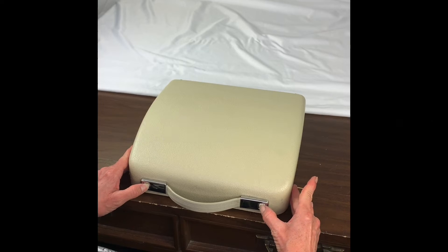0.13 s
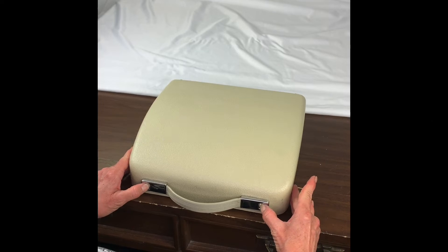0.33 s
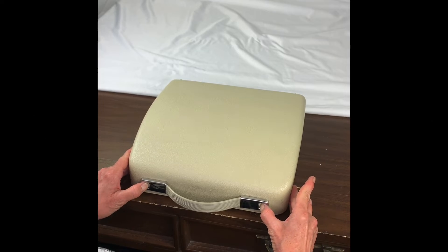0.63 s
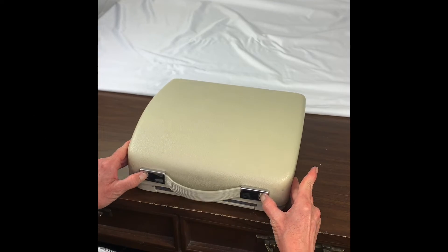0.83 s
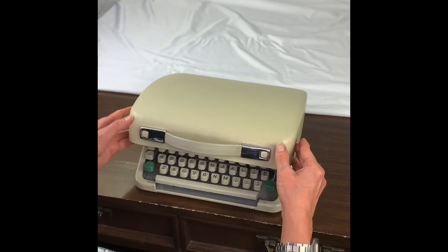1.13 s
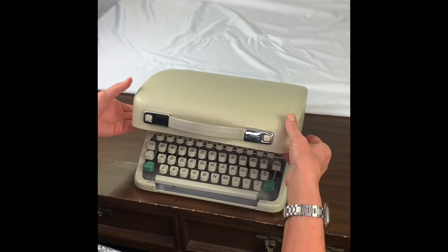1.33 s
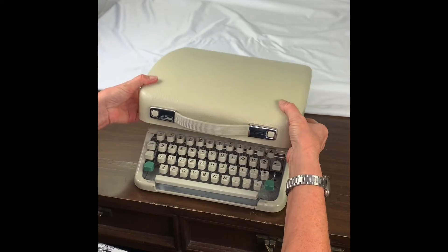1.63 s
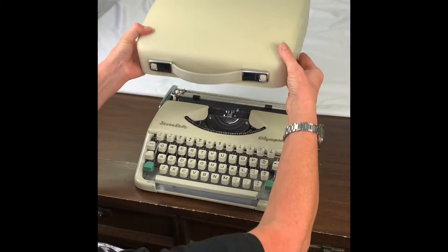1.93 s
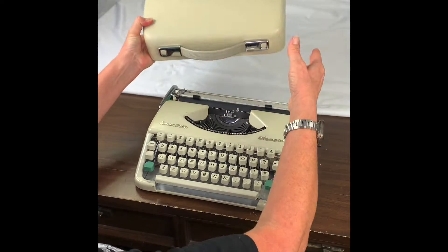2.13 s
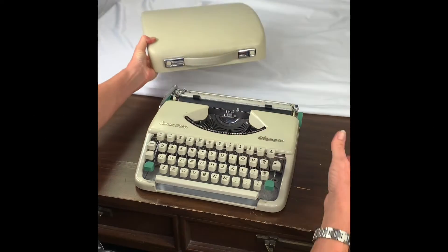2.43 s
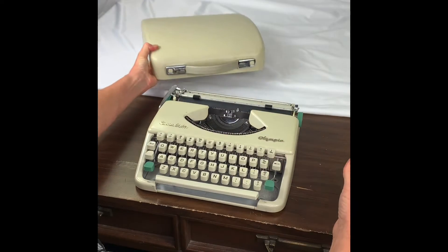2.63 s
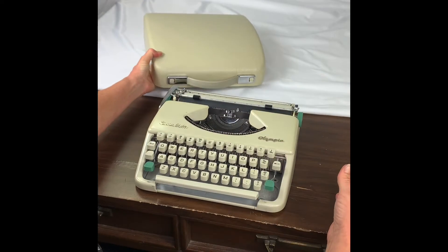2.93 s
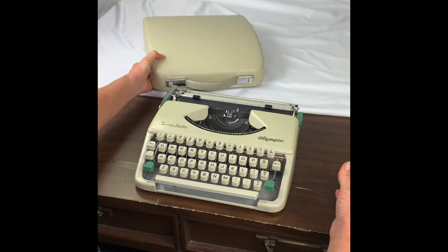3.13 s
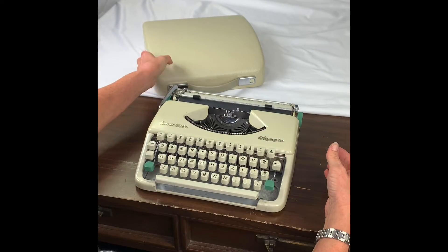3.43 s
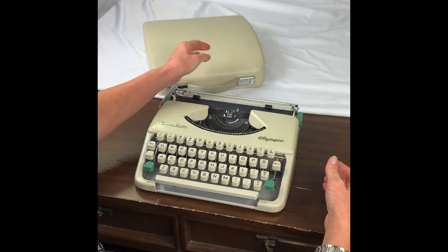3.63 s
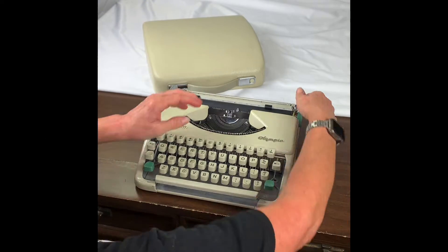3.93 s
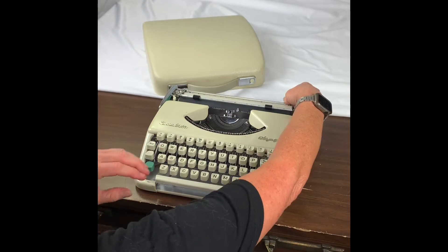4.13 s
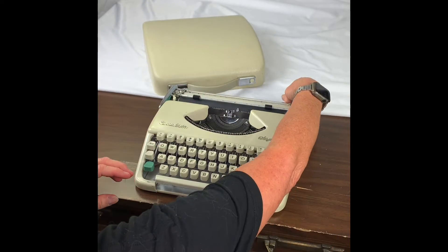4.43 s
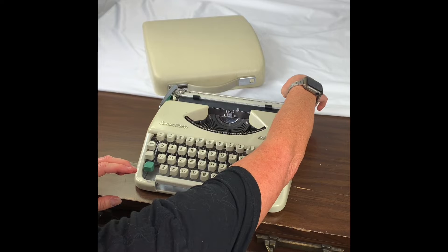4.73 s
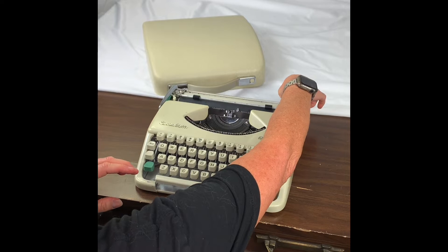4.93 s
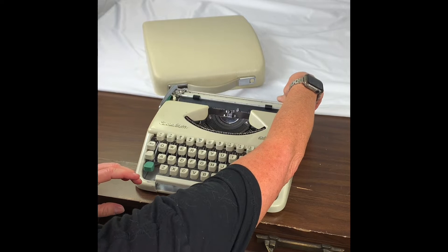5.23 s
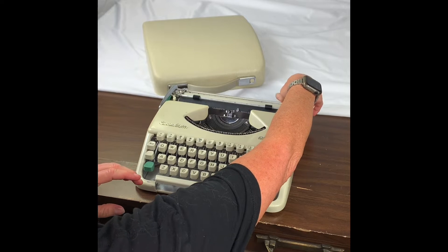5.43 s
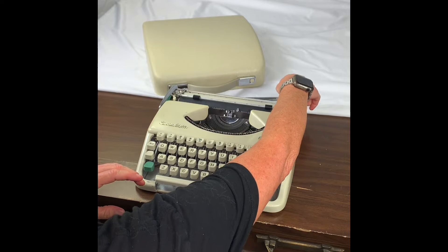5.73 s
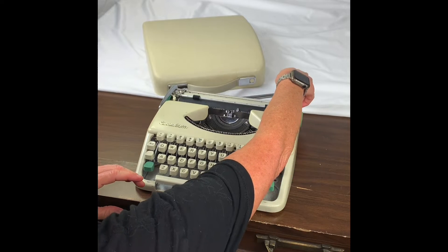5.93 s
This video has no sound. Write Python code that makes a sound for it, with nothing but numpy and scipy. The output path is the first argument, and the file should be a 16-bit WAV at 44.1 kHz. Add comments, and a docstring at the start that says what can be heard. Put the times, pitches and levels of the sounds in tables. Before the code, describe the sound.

Close up in a small room, latches spring, a plastic lid rattles free and knocks down on a table, followed by a crisp metallic lever snap.

```python
"""Over a low room rumble, thumbs spring the two metal latches of a hard plastic typewriter case (steel clicks).
The lid scrapes (stick-slip noise) and bumps off the machine (ringing shell, rim and table modes),
then is set down behind it with three hollow knocks. Later a hand snaps a steel lever on the carriage.
A small furnished room adds a short diffuse tail; a phone held above the table hears it at two ports."""
import sys
import numpy as np
from scipy import signal
from scipy.fft import rfft, irfft, next_fast_len
from scipy.io import wavfile
from scipy.ndimage import uniform_filter1d

SR = 44100
rng = np.random.default_rng(int(sys.argv[2]) if len(sys.argv) > 2 else 0)


def volts_from_db(level):
    """Convert decibel levels to linear amplitude ratios."""
    exponent = np.asarray(level, float) / 20
    return 10 ** exponent


def unload_audio(sound):
    """Save the sound as a 16-bit wav file, at the path given as the first command line argument."""
    columns = np.transpose(np.atleast_2d(sound))
    # keep every value between -1 and 1, then stretch to whole-number steps
    steps = np.round(np.clip(columns, -1, 1) * 32767)
    wavfile.write(sys.argv[1], SR, steps.astype(np.int16))


N = 268877  # samples

# hollow bumps of the lid, its knocks on the table, and last two faint thumps under the lever snap;
# rows a few ms apart are one knock ringing at several pitches:
# (time [s], peak of low rings [dB], low ring [Hz], upper ring [Hz], upper rings re low [dB])
BUMPS = [(0.35, -36.5, 295, 635, -5), (0.362, -21.5, 226, 660, -8.5), (0.483, -37.5, 208.7, 640, -23),
         (0.7, -40.5, 189, 650, -10.5), (0.72, -35.5, 216, 646, -3.5), (0.731, -30.5, 208, 656, -10),
         (0.756, -31, 228, 695, -18), (0.788, -31, 253, 854, -14), (0.994, -37, 289, 700, -37.5),
         (1.057, -30, 156, 657, -3.5), (1.096, -22.5, 307.4, 632, -3), (1.184, -29.5, 364, 633, -13),
         (1.287, -54, 292, 855, 13.5), (1.439, -44.5, 239, 865, -5), (1.482, -41.5, 320.5, 657, -6),
         (1.564, -38.5, 316, 640, -0.5), (1.581, -44, 300, 643, 8), (1.667, -27, 319.2, 964, 1.5),
         (1.682, -31.5, 218, 667, 5), (1.843, -39, 369, 638, -2), (1.854, -37, 377, 662, -12.5),
         (1.924, -51.5, 262, 647, 14), (1.966, -50.5, 380, 496, 4), (2.001, -43.5, 237, 516, 6),
         (2.072, -40, 376, 616, -5), (2.223, -62.5, 350, 590, 9.5), (2.546, -34.5, 267, 720, -4),
         (2.556, -8, 352.5, 735, -1.5), (2.557, -10.5, 191, 544, -13), (2.559, -11.5, 267.4, 646, 1),
         (2.598, -25, 336, 522, -15), (2.79, -52, 138, 644, -3), (2.948, -36.5, 284, 708, -2),
         (2.96, -11, 363, 780, -1.5), (2.961, -10.5, 270, 530, -12), (3.001, -29.5, 180, 485, -8.5),
         (3.129, -44.5, 149, 775, -10), (3.358, -16, 260, 610, -0.5), (3.362, -6.5, 213.9, 584, -12),
         (3.366, -18, 258, 744, 5.5), (3.379, -16.5, 376, 710, -7), (4.499, -52, 207, 668, 13),
         (4.525, -47, 180, 523, -6.5)]
# modes of the lid shell: (frequency [Hz], level [dB], t60 before scaling [s])
SHELL = [(142, -14.5, 0.2), (180, 5, 0.13), (195.7, 1, 0.3), (217.5, 7, 0.072), (248.8, -1.5, 0.057),
         (264.2, -5, 0.14), (289, 2.5, 0.15), (299.4, -2, 0.041), (348, 7.5, 0.079), (376, -2, 0.13),
         (445.5, -13.5, 0.3), (492, -4.5, 0.047), (522, -9.5, 0.18), (583.2, 0, 0.077), (646, 0, 0.065),
         (715, 4, 0.06), (775, -5, 0.039), (884, -12.5, 0.1), (1035, -3, 0.055), (1065, -15, 0.069)]
# modes of the table top: (frequency [Hz], level [dB], t60 before scaling [s])
TABLE_TOP = [(52, -14, 0.14), (73, -9, .8), (86.5, -9, 0.5)]


def along(table, hz):
    """A (frequency [Hz], value) table read on a log-frequency axis."""
    f, value = np.transpose(table)
    return np.interp(np.log(hz + 1), np.log(f + 1), value)


def unit(x):
    """Scale to rms 1."""
    return x / np.sqrt(np.mean(x ** 2))


def band(x, lo_hz, hi_hz):
    """Band-pass."""
    return signal.sosfilt(signal.butter(2, [lo_hz, hi_hz], "band", fs=SR, output="sos"), x)


def coloured(x, table):
    """Filter by a (frequency [Hz], gain [dB]) table."""
    n = x.shape[-1]
    gain = volts_from_db(along(table, np.fft.rfftfreq(n, 1 / SR)))
    return irfft(rfft(x) * gain, n)


def walk(rate_hz):
    """Random levels held 1 / rate_hz seconds and slewed twice."""
    hold = int(SR / rate_hz)
    steps = np.repeat(rng.standard_normal(N // hold + 1), hold)
    return 1.3 * uniform_filter1d(uniform_filter1d(steps, hold), hold)[:N]


def patchy(x, lo_hz, hi_hz, patchy_db, count=4):
    """Neighbouring bands, each with its own quick and slow flicker."""
    edges_hz = np.geomspace(lo_hz, hi_hz, count + 1)
    return sum(band(x, lo, hi) * volts_from_db(patchy_db * (walk(25) + walk(120)))
               for lo, hi in zip(edges_hz, edges_hz[1:]))


def add(out, s, sound, peak_db):
    """Lay a sound at time s with its peak at peak_db."""
    i = int(s * SR)
    out[:, i:i + sound.shape[1]] += (volts_from_db(peak_db) * sound / np.abs(sound).max())[:, :N - i]


def favour(modes, ring_hz, depth_db, octaves):
    """Where a thing is struck favours the modes near one pitch (dB)."""
    away = np.abs(np.log2(modes[:, :1] / ring_hz)) / octaves
    return -depth_db * np.minimum(away, 1)


def uneven(modes):
    """No two clicks share out their push among the modes alike (dB)."""
    return 2.5 * rng.standard_normal((len(modes), 1))


def rings(modes, gain_db, length, rise_cycles, spread, detune, stagger=np.pi):
    """Stereo sum of fading modes that swell over a few cycles; the ports differ a little in phase."""
    hz, db, t60_s = np.transpose(modes)[:, :, None]
    t = np.arange(int(0.35 * SR)) / SR
    chance = rng.standard_normal((2, len(modes), 1))
    start_rad = stagger * np.arange(len(modes))[:, None]
    turn = 2 * np.pi * hz * (1 + detune * chance[0]) * t + start_rad
    swell = 1 - np.exp(-t * hz / rise_cycles)
    fade = volts_from_db(db + gain_db - 60 * t / (t60_s * length)) * swell
    skew = spread * chance[1] * np.minimum(hz / 700, 1)  # radians, less in the bass
    return np.array([(fade * np.sin(turn + side * skew)).sum(0) for side in (1, -1)])


def crack(lo_hz, hi_hz, t60_s):
    """A noise burst standing for many unresolved short rings."""
    t = np.arange(int(0.2 * SR)) / SR
    mid, side = rng.standard_normal((2, len(t)))
    envelope = volts_from_db(-60 * t / t60_s) * (1 - np.exp(-t / 0.00037))
    burst = np.array([mid + 0.083 * side, mid - 0.13 * side]) * envelope
    return band(burst, lo_hz, hi_hz)


def rumble():
    """House and distant traffic: deep, nearly steady noise, alike at both ports only in the bass."""
    # (frequency [Hz], relative density [dB per Hz])
    spectrum = [(12, -44), (20, -15.5), (35, -9.5), (60, -0.5), (120, -8), (172, -6), (204, -16), (270, -9),
                (422, -15.5), (459, -15), (760, -26), (1060, -38), (1710, -39.5), (4060, -52),
                (7000, -54.5), (9600, -51.5), (16000, -60)]
    # (frequency [Hz], left-right correlation [-1..1])
    likeness = [(60, 0.92), (130, 0.93), (290, 0.38), (640, -0.75), (1410, -0.6), (3100, 0.23),
                (6820, 0.16), (15000, -0.0064)]
    n = next_fast_len(N)
    hz = np.fft.rfftfreq(n, 1 / SR)
    like = np.clip(along(likeness, hz), -0.99, 0.99)
    mid, side = rfft(rng.standard_normal((2, n))) * volts_from_db(along(spectrum, hz))
    mid = irfft(mid, n)[:N]
    side = irfft(side * np.sqrt((1 - like) / (1 + like)), n)[:N]
    level_db = -55.5 + 1.2 * walk(6)
    return volts_from_db(level_db) * np.array([mid + side, mid - side]) / np.std(mid)


def room(x):
    """Walls and furniture return a short diffuse tail, duller with time; its bass is alike at both ports."""
    # (frequency [Hz], t60 [s])
    decay = [(100, 0.33), (400, 0.14), (1500, 0.17), (5000, 0.18), (12000, 0.019)]
    t = np.arange(int(0.5 * SR)) / SR
    tail = 0
    for f in 60.0 * 2 ** np.arange(9):  # octave bands
        mid, side = band(rng.standard_normal((2, len(t))), f / 2 ** 0.5, min(f * 2 ** 0.5, 20000))
        pair = mid + min(f / 500, 1) * side * np.array([[1], [-1]])
        tail = tail + pair * volts_from_db(-60 * t / along(decay, f))
    tail = tail * (1 - np.exp(-t / 0.0047))
    tail = tail / np.sqrt(np.sum(tail ** 2) / 2)  # unit mean energy per port
    return volts_from_db(-10.5) * signal.oaconvolve(x, tail, axes=1)[:, :N]


def ports(x):
    """The two microphone ports hear the table out of step, by pitch."""
    # (frequency [Hz], left port's phase lead [rad])
    lead = [(30, .1), (150, .35), (350, .7), (1500, .7), (2300, 1.5), (4500, 2.6), (7300, 2.6), (8600, .7),
            (10600, -1.7), (13600, -5.7), (16400, -9.6)]
    n = next_fast_len(N)
    turn = np.exp(0.5j * along(lead, np.fft.rfftfreq(n, 1 / SR)))
    return irfft(rfft(x, n) * [turn, 1 / turn], n)[:, :N]


def thuds():
    """The machine or a wrist leaning on the table top: soft weight stirs only its deep modes."""
    # (time [s], peak [dB])
    leans = [(0.377, -39.5), (4.524, -43), (4.598, -45)]
    out = np.zeros((2, N))
    for s, db in leans:
        add(out, s, rings(TABLE_TOP, 0, 0.25, 1.0, 0.1, 0.025), db)
    return out


def stroke(start_s, length_s):
    """Pressure swells to a peak halfway and eases off; it fades out within a quarter length of either end."""
    at = (np.arange(N) / SR - start_s) / length_s
    return volts_from_db(np.interp(at, [-0.25, 0, 0.5, 1, 1.25], [-60, -7, 0, -7, -60], -200, -200))


def slides():
    """Lid and hands stick and slip: uneven friction grains rasp at the rim, boom in the shell and hiss."""
    # (start [s], length [s], rasp [dB], hollow re rasp before its 6.5 dB cut [dB], hiss re rasp [dB])
    strokes = [(0.026, 0.013, -65.5, -12, -38), (0.12, 0.07, -74, 5, -27), (0.45, 0.12, -80, 28.5, -3.5),
               (0.717, 0.11, -69, 24.5, -23), (0.81, 0.12, -70, 25.5, -7.5), (0.956, 0.23, -56, 13, -9.5),
               (1.13, 0.1627, -57.5, 12.5, -7.5), (1.259, 0.13, -64.5, 19.5, -1),
               (1.413, 0.088, -59.5, 8.5, -7.5), (1.495, 0.04, -59.5, 13, -5.5),
               (1.543, 0.16, -53.5, 7, -2), (1.883, 0.2, -63, 21.5, -4), (2.184, 0.082, -70, 21.5, -26),
               (3.105, 0.087, -70.5, 18.5, -2.5), (3.188, 0.1, -66.5, 22, 0.5),
               (3.287, 0.14, -67.5, 25, -0.5), (4.332, 0.1, -71.5, 6, -16.5),
               (5.274, 0.0736, -76, 8, -16.5), (5.628, 0.13, -73.5, -13, -3.5)]
    # friction spectrum: (frequency [Hz], relative density [dB per Hz])
    rub = [(530, -29.5), (900, -16), (1560, -3), (2070, -2), (2750, -8), (3500, -27.5), (5000, -16.5),
           (6800, -18.5), (8960, -17.5), (11500, -23.5), (12800, -26), (15500, -33.5)]
    catches = volts_from_db(2.2 * rng.exponential(size=N) + 3 * walk(300) + 1.5 * walk(45))
    grains = coloured(rng.standard_normal((2, N)) * catches, rub)
    push = rng.standard_normal(N) * volts_from_db(3 * walk(30))
    hollow = sum(volts_from_db(db + 2.5 * walk(12)) * band(push, f * 0.93, f * 1.07) for f, db, _ in SHELL[3:-1])
    hollow = volts_from_db(-6.5) * unit(hollow)
    rasp = unit(patchy(grains, 1000, 4800, 1.7))
    hiss = unit(patchy(grains, 3000, 15500, 0.9))
    out = np.zeros((2, N))
    for s, length_s, db, hollow_db, hiss_db in strokes:
        rubbing = rasp + volts_from_db(hollow_db) * hollow + volts_from_db(hiss_db) * hiss
        out += volts_from_db(db) * stroke(s, length_s) * rubbing
    return out


def clicks(table, modes, length, snap_db, jangle_db, clatter_db, top_hz):
    """Steel on steel: a snap, thin rings, and a broad jangle and clatter of loose parts."""
    out, modes = np.zeros((2, N)), np.array(modes)
    low, high = modes[modes[:, 0] < 5000], modes[modes[:, 0] > 5000]
    for s, db, high_hz, low_hz, low_db in table:
        high_gain_db = favour(high, high_hz, 11.0, 0.098) + uneven(high)
        low_gain_db = favour(low, low_hz, 10, 0.33) + uneven(low)
        add(out, s, crack(5300, top_hz, 0.015), db + snap_db)
        add(out, s, rings(high, high_gain_db, length, 1.9, 0.24, 0.0006), db)
        add(out, s, rings(low, low_gain_db, length, 1.2, 0.61, 0.003), db + low_db)
        add(out, s, crack(5000, top_hz, 0.087 * length), db + jangle_db)
        add(out, s, crack(350, 6500, 0.18 * length), db + low_db + clatter_db)
    return out


def levers():
    """Carriage levers: steel clicks with long thin rings up to 15 kHz."""
    # (time [s], peak of high rings [dB], high ring [Hz], low ring [Hz], low rings re high [dB])
    hits = [(4.0193, -73, 9100, 1330, 6.5), (4.458, -59, 13270, 1820, -0.5),
            (4.4618, -35, 12600, 4500, -12), (4.4982, -18, 10160, 1800, -13),
            (4.5064, -23, 11000, 1880, -9), (4.5204, -26.5, 10160, 2083, -12),
            (4.5374, -34, 9650, 1023, -14), (5.0649, -66, 8170, 3920, 6.5), (5.4266, -48.5, 8200, 1850, -1),
            (5.428, -50.5, 5870, 4500, -2), (5.4404, -66, 6200, 3540, -6),
            (5.6164, -69.5, 5340, 1780, 13.5), (5.7194, -72.5, 6270, 2083, -6)]
    # (frequency [Hz], level [dB], t60 before scaling [s])
    lever_modes = [(1034, -1, 0.13), (1430, -6, 0.08), (1625, -3, 0.06), (1880, 0, 0.05), (2083, 0, 0.11),
                   (2780, -6, 0.08), (3042, -8, 0.11), (3290, -5, .04), (3671, -4, 0.14), (4005, -2, 0.056),
                   (4436, -3, 0.1), (5340, -11, 0.12), (5846, -4, 0.07), (6266, -3, 0.06), (6767, -7, .087),
                   (7359, -10, 0.12), (8129, -1, 0.1), (9017, -8, 0.1), (9405, -4, 0.08), (9545, -3, 0.09),
                   (9636, -3, 0.11), (10160, 5, 0.075), (10240, -2, 0.1), (11100, 0, 0.06),
                   (12690, -3, 0.12), (12820, -4, .11), (12980, 4, .055), (14000, -3, .14),
                   (15090, -3, 0.17), (15380, -2, 0.1)]
    return clicks(hits, lever_modes, 0.9, 0.37, -4.0, -1.25, 14000)


def latches():
    """Latch springs, pressed and later jolted: shorter steel clicks."""
    # (time [s], peak of high rings [dB], high ring [Hz], low ring [Hz], low rings re high [dB])
    hits = [(0.2668, -65, 7660, 3100, 1), (0.294, -56.5, 8340, 2120, -1), (0.3045, -49, 7800, 1440, -7),
            (0.3217, -45.5, 8800, 1320, -12), (0.3353, -39.5, 8500, 3960, -6),
            (0.3504, -45.5, 8700, 1460, 6.5), (0.3612, -44.5, 8570, 1300, 8),
            (0.3706, -39, 10300, 3070, -12), (0.4436, -46.5, 7000, 3170, 2), (1.667, -46.5, 8085, 4780, 4),
            (2.960, -56.5, 8400, 4640, -11), (3.358, -38.5, 6190, 4580, -19)]
    # (frequency [Hz], level [dB], t60 before scaling [s])
    latch_modes = [(1040, -4, .08), (1281, -6, 0.16), (1362, -4, 0.16), (1770, -5, 0.18), (2100, -10, 0.1),
                   (2747, -1, 0.11), (3074, -2, 0.1), (3503, -3, 0.09), (4030, -9, 0.07), (4610, -5, 0.04),
                   (5211, -2, 0.08), (5700, 4, .05), (6100, 6, 0.08), (7360, 10.5, 0.039),
                   (7940, 12.5, 0.049), (8550, 13, 0.025), (9100, -1.5, 0.048), (10300, 2, 0.06),
                   (13100, -21.5, 0.056)]
    return clicks(hits, latch_modes, 0.66, 0.89, -2.6, -8.5, 8600)


def rim():
    """Hard contacts ring the bare rim with a crack and an edge tick; dull bumps do so faintly."""
    # (time [s], peak of rings [dB], ring [Hz], edge tick re rings [dB])
    clacks = [(0.361, -38, 2560, 3), (0.478, -54, 1390, -25.5), (0.718, -45, 1950, -37),
              (0.788, -45.5, 1480, -37), (0.993, -54, 1900, -11), (1.044, -41.5, 1240, -24),
              (1.091, -47.5, 1850, -4), (1.182, -39, 1360, -9.5), (1.287, -34.5, 1860, -37),
              (1.29, -42, 2280, -32), (1.437, -55, 2100, -4), (1.578, -49, 2500, 1.5),
              (1.664, -28.5, 2100, -8), (1.68, -34.5, 2680, -9), (1.908, -56, 2100, -3),
              (1.926, -40.5, 1840, -5.5), (1.964, -46, 1950, -19), (1.993, -47, 2020, -3),
              (2.001, -43.5, 1950, -19), (2.027, -50.5, 2000, 3), (2.06, -35.5, 1900, -9),
              (2.188, -56, 1800, -30), (2.206, -50, 1970, -32), (2.222, -54, 1970, -29.5),
              (2.243, -54.5, 1990, -31), (2.789, -53.5, 2018, -36.5), (2.949, -46.5, 1940, -49),
              (3.129, -63, 1400, -3), (3.198, -52, 1500, -24), (3.232, -49.5, 1880, -23.5),
              (3.357, -40.5, 1930, 6.5)]
    # (frequency [Hz], level [dB], t60 [s])
    rim_modes = np.array([(1215, -5.5, 0.048), (1388, -1.5, 0.06), (1500, 1, 0.07), (1650, -6, 0.07),
                          (1838, 6, 0.038), (1960, 7, 0.032), (2130, 1, 0.05), (2330, 1, 0.05),
                          (2535, -7, 0.08), (2670, -2.5, 0.07), (3007, -6, 0.038)])
    out = np.zeros((2, N))
    faint = [(s, db - 27.5, 1570, -29.5) for s, db, *_ in BUMPS]
    for s, db, ring_hz, tick_db in [*clacks, *faint]:
        gain_db = favour(rim_modes, ring_hz, 5.1, 0.25)
        add(out, s, rings(rim_modes, gain_db, 1.0, 2.7, 0.65, 0.034), db)
        add(out, s, crack(740, 5100, 0.13), db - 14.0)
        add(out, s, crack(2100, 10000, 0.038), db + tick_db)
    return out


def bumps():
    """Each contact rings table, low and upper shell modes and two short woody cracks."""
    out, shell = np.zeros((2, N)), np.array(SHELL)
    low, upper = shell[shell[:, 0] < 460], shell[shell[:, 0] > 460]
    for s, db, low_hz, upper_hz, upper_db in BUMPS:
        low_gain_db = favour(low, low_hz, 21.5, 0.16)
        upper_gain_db = favour(upper, upper_hz, 20, 0.24)
        add(out, s, rings(TABLE_TOP, 0, 0.81, 0.53, 0.14, 0.041), db - 26.0)
        add(out, s, rings(low, low_gain_db, 0.72, 2.1, 0.27, 0.0044, stagger=0.37), db)
        add(out, s, rings(upper, upper_gain_db, 1.0, 0.72, 0.25, 0.008, stagger=0.71), db + upper_db)
        add(out, s, crack(170, 730, 0.11), db - 10.0)
        add(out, s, crack(570, 1300, 0.055), db + upper_db - 17.0)
    return out


def scene():
    """Sounds from the table, their room tail and the background."""
    near = slides() + thuds() + levers() + latches() + rim() + bumps()
    return ports(near) + room(near) + rumble()


def band_limit(x):
    """A steep low-pass at the top of the band."""
    return signal.sosfilt(signal.butter(12, 16830, fs=SR, output="sos"), x)


def record(dry):
    """The microphone cuts the deepest bass and has a notch in the high treble."""
    # (frequency [Hz], gain [dB])
    mic_response = [(15, -30), (42, 0), (10800, 0), (11300, -6), (11700, -22), (12100, -6), (12500, 0),
                    (16000, 0)]
    heard = coloured(dry, mic_response)
    return band_limit(heard)


dry = scene()
out = record(dry)
unload_audio(out)
```